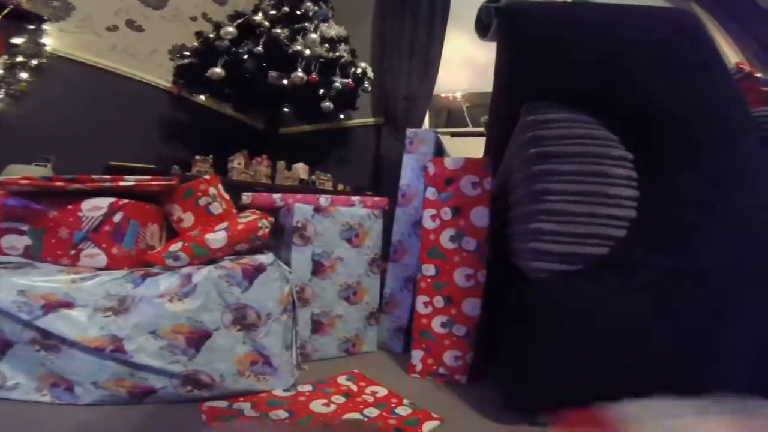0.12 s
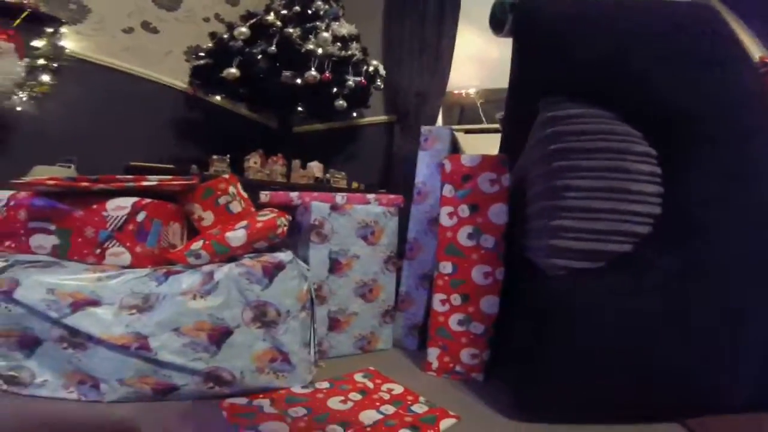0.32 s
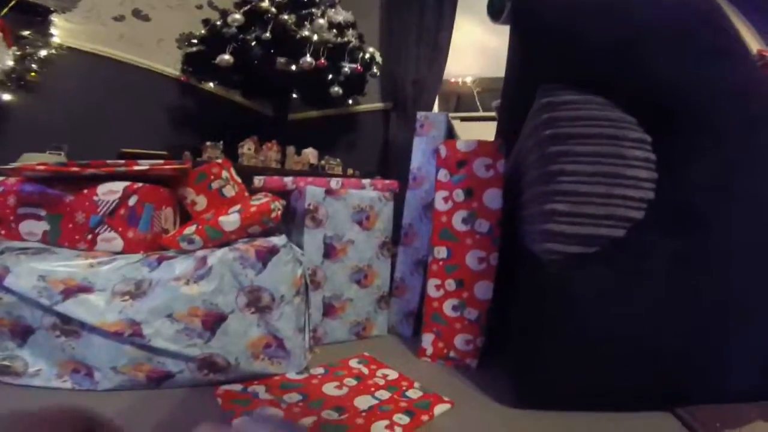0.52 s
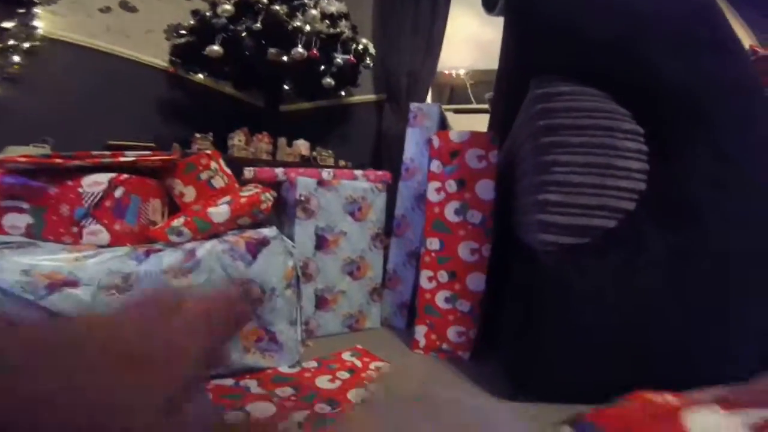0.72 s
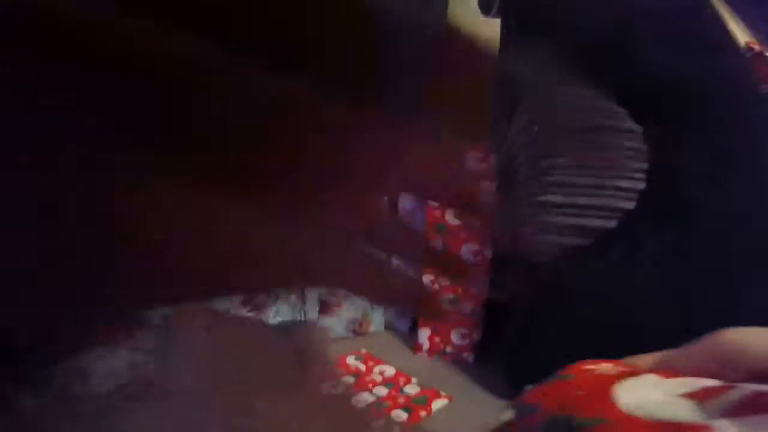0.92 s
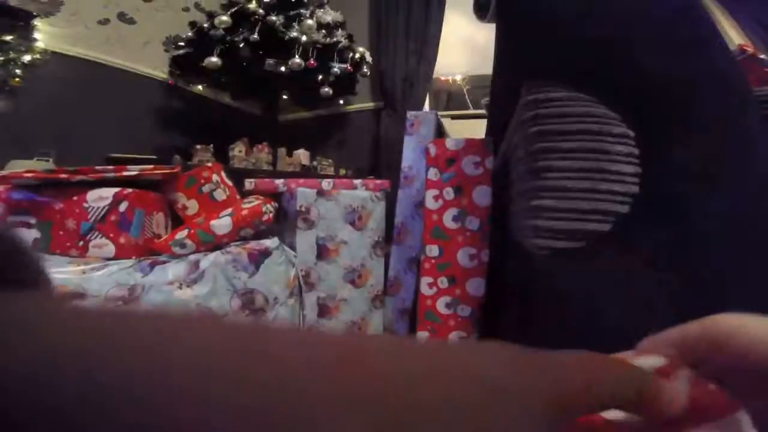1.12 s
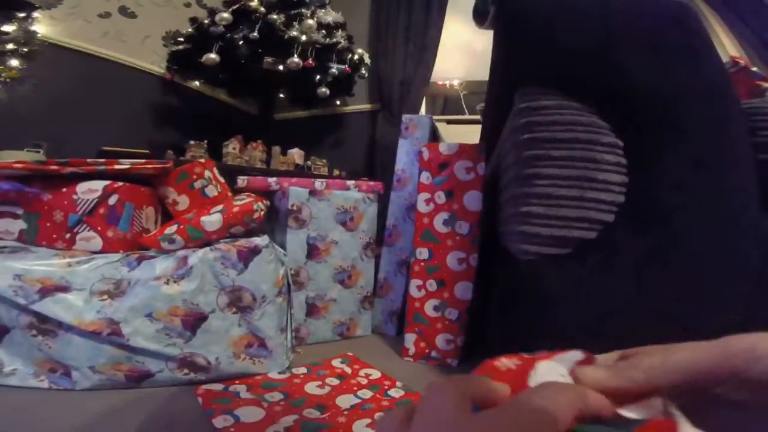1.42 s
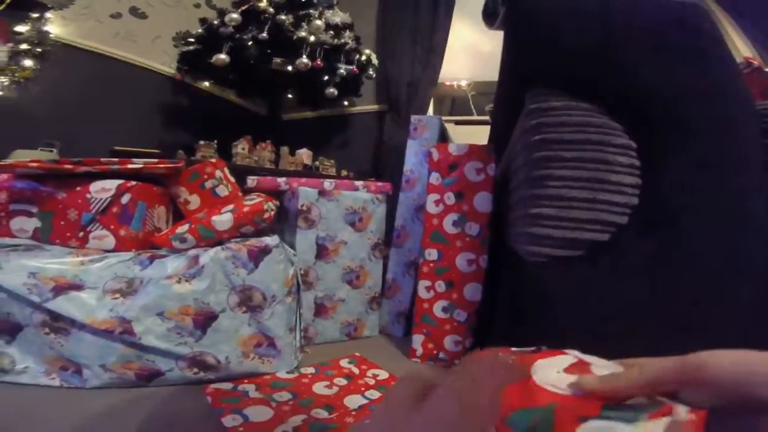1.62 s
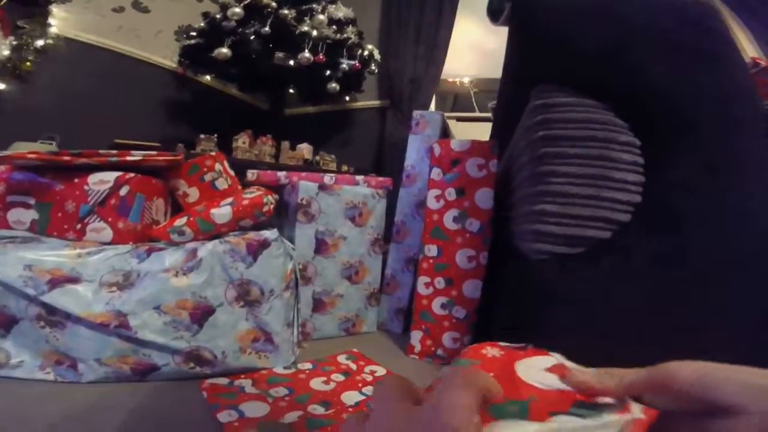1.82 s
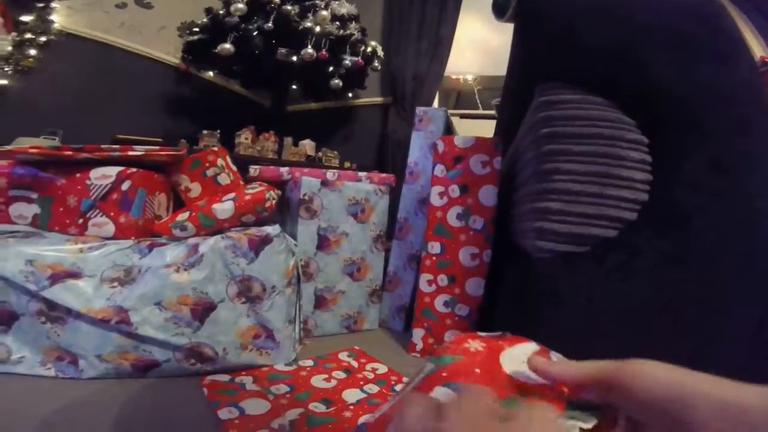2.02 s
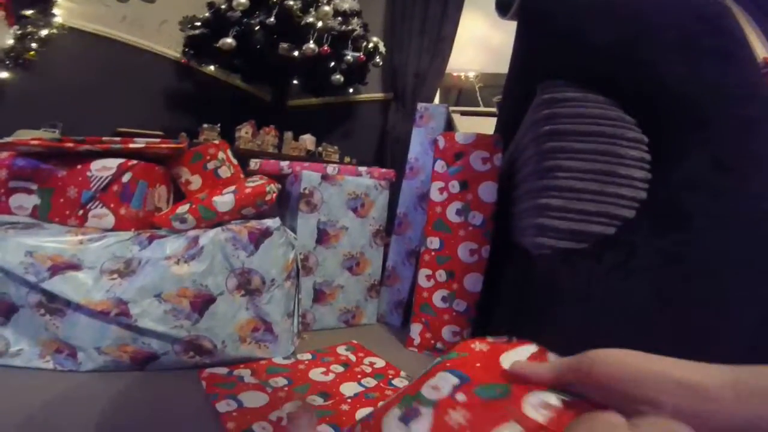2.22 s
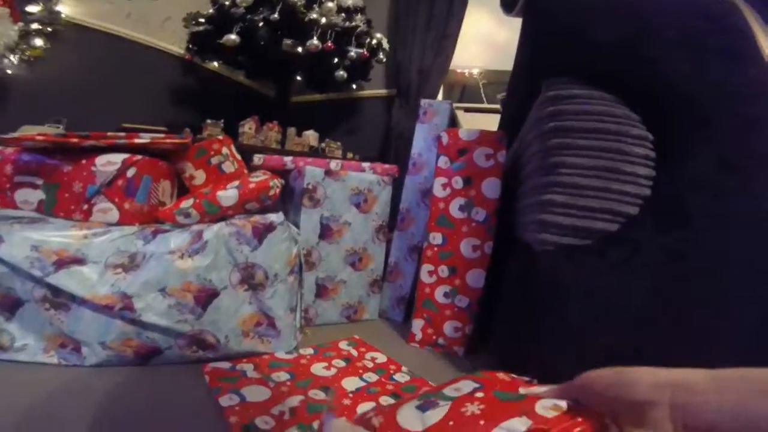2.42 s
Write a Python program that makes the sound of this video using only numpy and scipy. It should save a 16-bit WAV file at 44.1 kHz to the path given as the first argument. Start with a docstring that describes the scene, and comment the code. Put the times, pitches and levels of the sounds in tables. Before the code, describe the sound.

Wrapping paper close to a small microphone in a furnished room: light crackles, a loud short rip with dull panel pops, one sharp snap, sparse quiet rustling, then another brief strong crumple.

```python
"""A dry crackle of wrapping paper, then a rip as the snaps grow loud, then crumpling in the hands, close by.
Tiny creases are random clicks through ringing filters; single creases are short noise bursts that snap.
Broad panels of the sheet are low rings with a duller pop, and hands bump the parcel with lower ones.
A finger slides briefly over the glossy face as narrow high hiss. Low rumble and room tone lie below,
and a short tail of noise makes the furnished room around the small microphone."""
import sys
import numpy as np
from scipy import signal
from scipy.fft import rfft, irfft
from scipy.io import wavfile
from scipy.ndimage import uniform_filter1d

SR = 44100
rng = np.random.default_rng(int(sys.argv[2]) if len(sys.argv) > 2 else 0)


def to_linear_factor(level_db):
    """Convert decibel levels (scalar or array-like) to linear amplitude factors."""
    exponent = np.asarray(level_db, float) / 20
    return 10 ** exponent


def log_audio(samples):
    """Write samples as a 16-bit WAV file to the path given in sys.argv[1]."""
    # one column per channel
    frames = np.atleast_2d(samples).T
    # limit to full scale, then quantise
    limited = np.clip(frames, -1, 1)
    pcm = np.round(limited * 32767).astype(np.int16)
    wavfile.write(sys.argv[1], SR, pcm)


N = 114660  # length in samples, 2.6 s

# Colour of a crease at the microphone. Each row: frequency in Hz, relative level in dB.
SHEET = [(300, -39), (1000, -6.5), (1300, -13), (2040, -1), (2800, -2), (3830, -2.5), (4410, -3.5),
         (5440, -7.5), (7730, -8.5), (10000, -21), (12600, -23), (14200, -28), (15400, -28), (15900, -98)]
# Colour of the flexing panels. Each row: frequency in Hz, relative level in dB.
PANEL = [(90, -61.5), (170, -10.5), (357, -6.5), (572, -3.5), (779, 1), (1000, -9), (1250, -17),
         (3080, -70.5)]


def rms_one(x):
    """Scales a sound to an average (rms) level of 1."""
    return x / np.sqrt(np.mean(x ** 2) + 1e-20)


def coloured(x, spectrum, size=2048):
    """Causal (minimum-phase) filter with the given spectrum, unit energy."""
    hz, db = np.transpose(spectrum)
    bins = np.maximum(np.arange(size // 2 + 1) * SR / size, 1)
    log_gain = np.log(to_linear_factor(np.interp(np.log(bins), np.log(hz), db)))
    # Folding the cepstrum forward in time puts the filter's energy as early as it can be.
    cepstrum = irfft(log_gain)
    cepstrum[1:size // 2] *= 2
    cepstrum[size // 2 + 1:] = 0
    response = irfft(np.exp(rfft(cepstrum)))
    return signal.fftconvolve(x, response / np.sqrt(np.sum(response ** 2)))[:len(x)]


def band_noise(low_hz, high_hz):
    """White noise kept between two frequencies."""
    band = signal.butter(2, [low_hz, high_hz], "band", fs=SR, output="sos")
    return signal.sosfilt(band, rng.standard_normal(N))


def drift(rate_hz):
    """Slow random wandering with spread 1: noise smoothed twice at the given rate."""
    r = np.exp(-2 * np.pi * rate_hz / SR)
    noise = rng.standard_normal(N + SR)
    settled = signal.lfilter([1], [1, -2 * r, r * r], noise)[SR:]
    return rms_one(settled)


def ring(x, hz, cycles):
    """A resonance that dies 60 dB in so many cycles."""
    r = to_linear_factor(-60 * hz / (cycles * SR))
    w = 2 * np.pi * hz / SR
    return signal.lfilter([np.sin(w)], [1, -2 * r * np.cos(w), r * r], x + 1e-18)


def clicks(per_s, spread_db):
    """Random clicks of very uneven size, either way up."""
    sizes = to_linear_factor(spread_db * np.minimum(rng.exponential(1, N), 5))
    signs = rng.choice([-1, 1], N)
    return sizes * signs * (rng.random(N) < per_s / SR)


def evened(x, seconds=0.0237):
    """Level held near 1 over the given time, though lulls stay softer."""
    local_power = uniform_filter1d(x ** 2, int(seconds * SR))
    return x / np.sqrt(local_power + 0.33 * np.mean(x ** 2))


def add(out, s, sound, db):
    """Lays a sound in at its time with the given peak."""
    i = int(s * SR)
    out[i:i + len(sound)] += (sound * to_linear_factor(db) / np.abs(sound).max())[:N - i]


def pops(rows, cycles):
    """A soft push, one cycle long, sets a low ring going."""
    out = np.zeros(N)
    signs = rng.choice([-1, 1], len(rows))
    for (s, db, hz), sign in zip(rows, signs):
        period = int(SR / hz)
        push = np.zeros(int(cycles * SR / hz))
        push[:period] = np.hanning(period) * np.sin(np.linspace(0, 2 * np.pi, period))
        add(out, s, sign * ring(push, hz, cycles), db)
    return out


def treble(x):
    """What lies above a low edge in the treble, falling away toward the top."""
    edge_hz = 6740
    high = signal.sosfilt(signal.butter(2, edge_hz, "high", fs=SR, output="sos"), x)
    return rms_one(coloured(high, [(edge_hz, 0), (12600, -8), (15300, -9), (16000, -40)]))


def room_tone():
    """Steady coloured noise: the quiet sound of the room itself."""
    # Each row: frequency in Hz, relative level in dB.
    tone_colour = [(20, -8), (705, -5.5), (1270, -23), (3080, -7), (5530, -25), (12400, -29), (15900, -60)]
    return to_linear_factor(-57.5) * coloured(rng.standard_normal(N), tone_colour, size=8192)


def rumble():
    """Lumpy low noise that hands pass to the casing."""
    # Hands nearer or farther from the casing.
    # Each row: time in seconds, level in dB around which the lumps rise and fall.
    nearness = [(0, -59), (.32, -45), (.5, -63.5), (.78, -52.5), (1.15, -47), (1.3, -59.5), (1.79, -53),
                (2.1, -58.5)]
    level_db = np.interp(np.arange(N) / SR, *np.transpose(nearness))
    lumps_db = 3.6 * drift(5.1)
    return to_linear_factor(level_db + lumps_db) * rms_one(band_noise(22, 148))


def bumps():
    """Hands bumping the parcel: low thuds that die within three cycles."""
    # Each row: start in seconds, peak in dB, pitch in Hz.
    bump_rows = [(0.899, -24.5, 126), (0.985, -32, 150), (1.103, -29, 170)]
    return pops(bump_rows, cycles=3)


def finger_slide():
    """A finger on the glossy face: a thin high hiss that swells and fades, with some airy treble."""
    middle_s, spread_s = 0.992, 0.018
    hiss_hz, width_hz = 7420, 410  # the width is approximate
    level_db, air_db = -42, -10  # air relative to hiss
    swell = np.exp(-.5 * ((np.arange(N) / SR - middle_s) / spread_s) ** 2)
    hiss = rms_one(ring(rng.standard_normal(N), hiss_hz, 2.5 * hiss_hz / width_hz))
    air = to_linear_factor(air_db) * treble(rng.standard_normal(N))
    return to_linear_factor(level_db + drift(80)) * swell * (hiss + air)


def rip():
    """While the tear runs, fibres part in a dense bright patter; it swells in slowly and stops dead."""
    start_s, swell_s, end_s, edge_s = 0.165, 0.07, 0.404, 0.003
    fibres_per_s, size_spread_db = 4000, 4.5
    level_db, clump_db = -38, 2.5
    t = np.arange(N) / SR
    fade_in = np.clip((t - start_s) / swell_s, 0, 1)
    fade_out = np.clip((end_s - t) / edge_s, 0, 1)
    patter = treble(clicks(fibres_per_s, size_spread_db))
    return to_linear_factor(level_db + clump_db * drift(89)) * fade_in * fade_out * patter


def patchy_noise():
    """Noise whose bands swell and fade each on its own."""
    band_edges = np.geomspace(700, 16000, 8)
    total = np.zeros(N)
    for low_hz, high_hz in zip(band_edges, band_edges[1:]):
        total += to_linear_factor(3 * drift(30)) * band_noise(low_hz, high_hz)
    return rms_one(total)


def tiny_creases(work_db):
    """Tiny creases tick faster as the sheet is worked harder; each rings at one of twelve pitches."""
    ticks_per_s, size_spread_db = 1300, 5  # the rate is a starting point, moved by the next line
    follow, clump_db = 0.35, 5.5  # how far the rate follows the work, and how unevenly it bunches
    rate_db = follow * (work_db - work_db.mean()) + clump_db * drift(32)
    ticks = clicks(ticks_per_s * to_linear_factor(rate_db), size_spread_db)
    dealt = rng.integers(0, 12, N)  # deals each tick to a pitch
    rung = np.zeros(N)
    for k, hz in enumerate(np.geomspace(1200, 10000, 12)):
        own_ticks = ticks * (dealt == k) * to_linear_factor(3 * drift(19))
        rung += ring(own_ticks, hz, cycles=8)
    return evened(coloured(rung, SHEET))


def handling():
    """Working the sheet: tiny creases crackle over patchy rustle, and panels wobble below."""
    # How hard the sheet is worked.
    # Each row: time in seconds, overall level in dB, panel wobble relative to that level in dB.
    work = [(0, -33.5, -7), (0.067, -51, -2), (0.088, -35.5, -9), (0.119, -47, 2.5), (0.164, -38.5, -9),
            (0.191, -26, -5.5), (0.229, -21, -3), (0.276, -15, -8), (0.284, -9, -11.5), (.308, -13.5, -6),
            (0.313, -16.5, -6.5), (0.356, -18, -8), (.398, -31, -8.5), (0.409, -56.5, 8), (.455, -42, -3.5),
            (0.491, -49.5, 1), (.54, -70.5, 19.5), (.61, -49, -0.5), (.75, -49, 0.5), (0.875, -48.5, 1.5),
            (0.9, -32.5, 1.5), (0.934, -55.5, 6.5), (0.976, -31.5, -8), (1.009, -42, -2), (1.053, -55.5, 0),
            (1.093, -36, 1.5), (1.152, -27.5, -5.5), (1.192, -37.5, 4), (1.223, -51.5, 2),
            (1.287, -31, -2.5), (1.315, -37.5, 2), (1.401, -39, -3), (1.475, -50.5, -0.5), (1.53, -55, 4),
            (1.554, -45.5, 2), (1.65, -39.5, -2.5), (1.69, -41.5, -2), (1.73, -51, 5.5), (1.9, -45, 0),
            (1.957, -43.5, 6.5), (2.01, -50, 2), (2.04, -36, -8.5), (2.075, -45.5, 9), (2.105, -37, 2),
            (2.136, -46.5, 6), (2.188, -43.5, 2.5), (2.212, -34.5, 0), (2.276, -40, 5), (2.284, -20, -1.5),
            (2.308, -21.5, -7.5), (2.321, -28.5, 2.5), (2.352, -33.5, -4), (2.394, -53, 7.5),
            (2.413, -46.5, 10.5), (2.483, -35.5, 6.5), (2.501, -46.5, 1), (2.569, -43, -1.5),
            (2.583, -34, 8.5), (2.6, -45, -16)]
    crackle_db, rustle_db, flicker_db = -3, -8, 3.5
    wobbles_per_s, wobble_spread_db = 1200, 3
    t = np.arange(N) / SR
    s, db, relative_db = np.transpose(work)
    work_db = np.interp(t, s, db)
    panel_db = np.interp(t, s, relative_db)
    crackle = to_linear_factor(crackle_db) * tiny_creases(work_db)
    rustle = rms_one(coloured(patchy_noise(), SHEET))
    rustle = to_linear_factor(rustle_db + flicker_db * drift(44)) * rustle
    panels = evened(coloured(clicks(wobbles_per_s, wobble_spread_db), PANEL))
    panels = to_linear_factor(panel_db + flicker_db * drift(51)) * panels
    return to_linear_factor(work_db) * (crackle + rustle + panels)


def flexes():
    """Broad panels of the sheet pop in or out and ring dully for eight cycles."""
    # Each row: start in seconds, peak in dB, ring in Hz.
    flex_rows = [(0.084, -23, 660), (0.09, -20, 665), (0.114, -22, 710), (0.143, -16, 820),
                 (0.252, -0.5, 720), (0.289, -8, 670), (0.307, -1.5, 760), (1.121, -19, 870),
                 (1.506, -27.5, 785), (1.938, -23.5, 567), (1.952, -22.5, 565), (2.111, -20, 920),
                 (2.281, -6.5, 860), (2.301, -6.5, 810), (2.575, -23, 378)]
    return pops(flex_rows, cycles=8)


def snaps():
    """Each crease gives way in a short dry burst with a weaker after-slip, a ring and a panel shake."""
    # Creases that buckle. Each row: start in seconds, peak in dB.
    creases = [(.0488, -20.5), (.073, -23.5), (0.0958, -18.5), (0.1161, -18.5), (0.136, -24), (0.1438, -8),
               (0.1576, -25), (0.1727, -20), (0.2036, -17), (0.2153, -9.5), (0.2517, -4), (0.2597, -2.5),
               (0.2795, -1), (0.3087, -6), (0.38, -29), (0.3992, -25), (0.4321, -25), (0.4344, -33),
               (0.449, -22), (0.4562, -13.5), (0.4671, -25), (0.473, -21.5), (0.4922, -27), (0.5199, -30),
               (0.5602, -28.5), (0.6056, -30), (.6135, -28), (0.682, -32.5), (0.7389, -26), (0.7733, -25),
               (0.7903, -26.5), (0.8163, -28.5), (.8944, -25), (0.9051, -21.5), (0.979, -29), (1.0458, -34),
               (1.0748, -26.5), (1.0897, -29), (1.1205, -9.5), (1.1495, -2.5), (1.1582, -20),
               (1.1825, -14.5), (1.1924, -25.5), (1.2416, -21), (1.268, -17.5), (1.286, -17.5),
               (1.2975, -21), (1.3371, -10), (1.4082, -26.5), (1.5068, -27.5), (1.5958, -21), (1.6049, -22),
               (1.627, -35), (1.6439, -26), (1.766, -29.5), (1.7829, -32), (1.803, -20.5), (1.8487, -27),
               (1.873, -32), (1.8973, -19.5), (1.9917, -24), (2.0182, -15), (2.0361, -25), (2.0464, -24.5),
               (2.088, -23), (2.111, -27.5), (2.1144, -17.5), (2.1407, -20), (2.1496, -16.5), (2.1617, -24),
               (2.1861, -26), (2.267, -23), (2.2851, -11), (2.2964, -7.5), (2.3274, -13.5), (2.3422, -6.5),
               (2.3764, -30), (2.4502, -24.5), (2.4741, -22.5), (2.5006, -23.5), (2.5502, -19),
               (2.574, -14.5), (2.5904, -16.5)]
    burst_s, longest_lag_s = 0.0004, 0.004
    lowest_hz = 2000  # bottom of both the ring pitches and the dullness cutoffs
    ring_db, body_db = -8.5, -1.5  # relative to the burst; the body is at its strongest here
    out = np.zeros(N)
    t = np.arange(600) / SR
    for s, db in creases:
        noise = rng.standard_normal(600)
        pitch, shake, bright, lag = rng.random(4)  # each crease differs by chance
        late = np.maximum(t - longest_lag_s * lag, 0)
        first_slip = t * np.exp(-t / burst_s)
        after_slip = .5 * shake * late * np.exp(-late / burst_s)
        burst = noise * (first_slip + after_slip)
        # A one-pole low-pass, 2 to 20 kHz, makes some snaps duller.
        dull = np.exp(-2 * np.pi * lowest_hz * 10 ** bright / SR)
        dulled = signal.lfilter([1], [1, -dull], burst)
        sound = rms_one(coloured(dulled, SHEET, size=512))
        sound += to_linear_factor(ring_db) * rms_one(ring(burst, lowest_hz * 2 ** pitch, cycles=11))
        sound += shake * to_linear_factor(body_db) * rms_one(coloured(burst, PANEL))
        add(out, s, sound, db)
    return out


def room(x):
    """A short diffuse tail: noise that starts after 3 ms and dies 60 dB in 0.12 s."""
    t = np.arange(int(.3 * SR)) / SR
    tail = rng.standard_normal(len(t)) * to_linear_factor(-60 * t / 0.12) * (t > .003)
    return signal.fftconvolve(x, tail / np.sqrt(np.sum(tail ** 2)))[:N]


def scene():
    """Paper and finger with their room, then bumps, rumble and room tone."""
    paper = handling() + snaps() + flexes() + finger_slide() + rip()
    echo = to_linear_factor(-20) * room(paper)
    mix = paper + echo + bumps() + rumble() + room_tone()
    return mix[None]  # one channel


def top_cut(x):
    """Nothing passes above the cut-off."""
    return signal.sosfilt(signal.butter(12, 16090, fs=SR, output="sos"), x)


def record(dry):
    """Rounds off the loudest peaks and finishes the mix."""
    rounded = np.tanh(dry)
    return top_cut(rounded)


dry = scene()
out = record(dry)
log_audio(out)
```